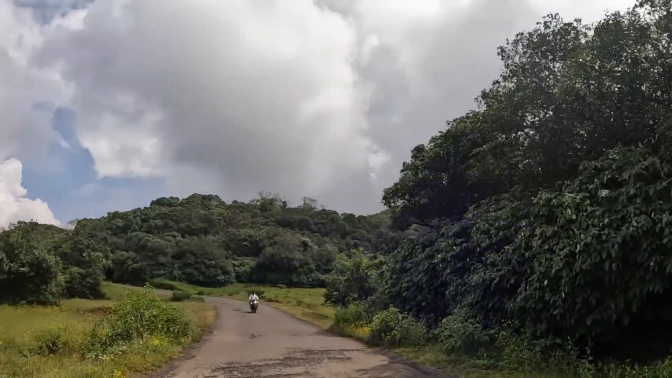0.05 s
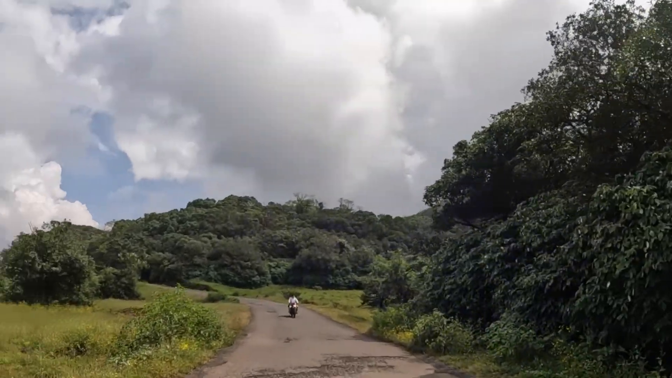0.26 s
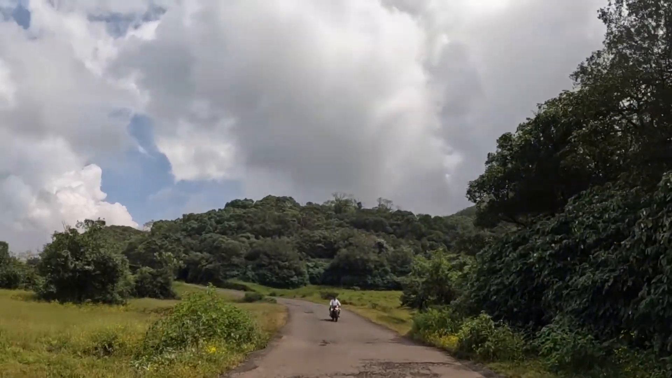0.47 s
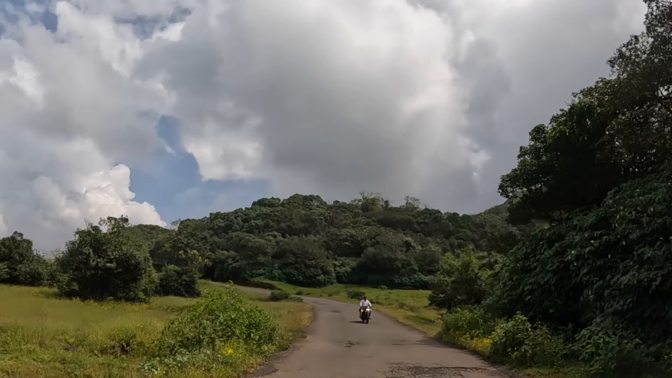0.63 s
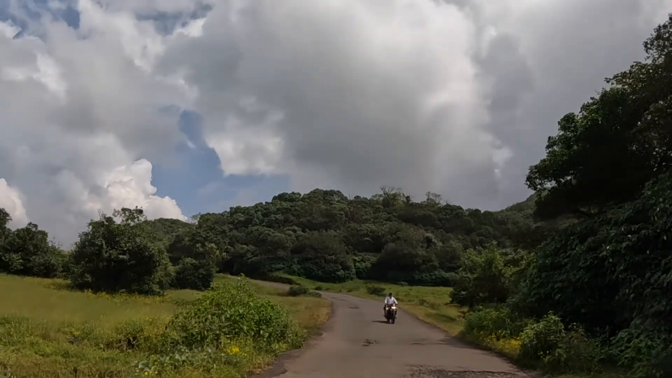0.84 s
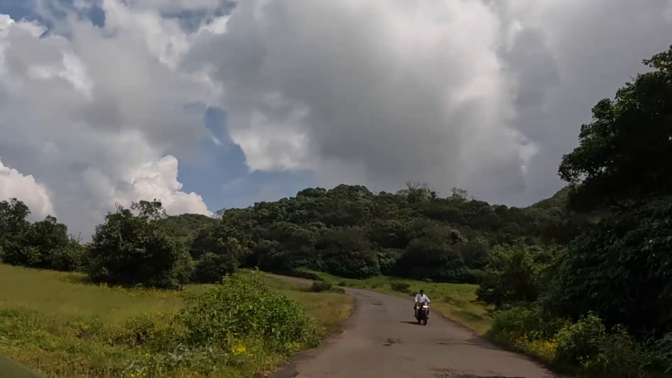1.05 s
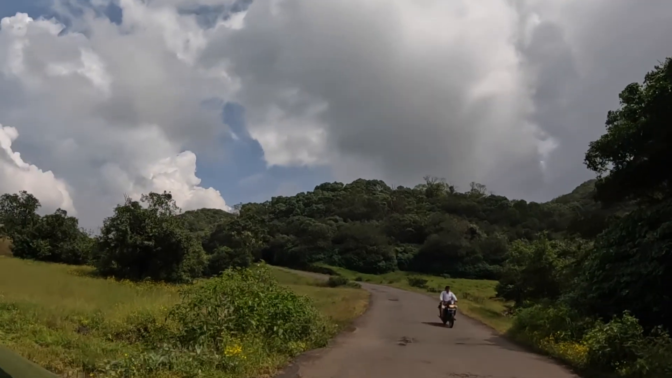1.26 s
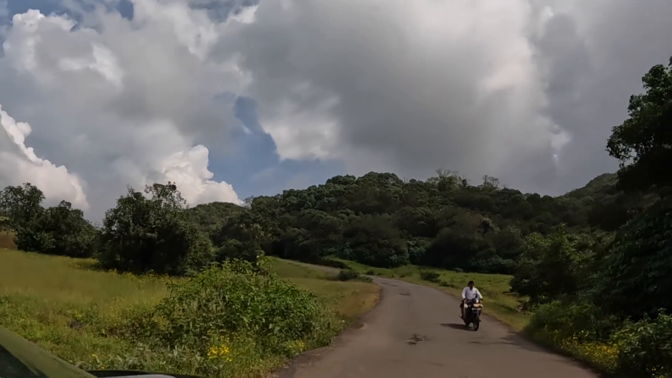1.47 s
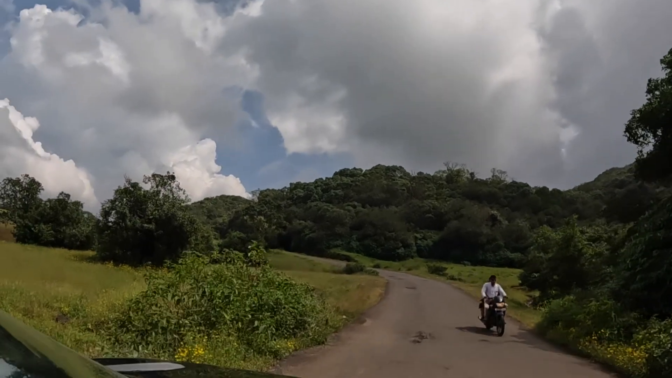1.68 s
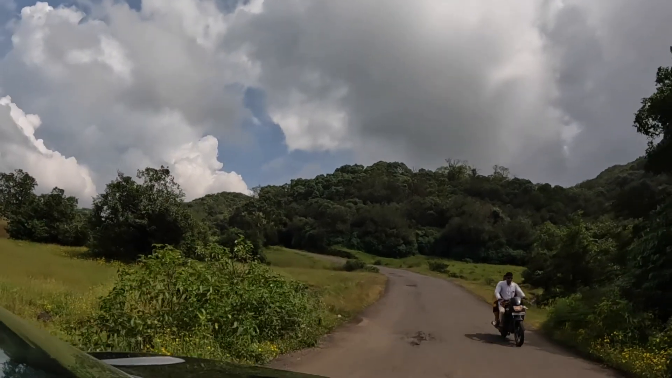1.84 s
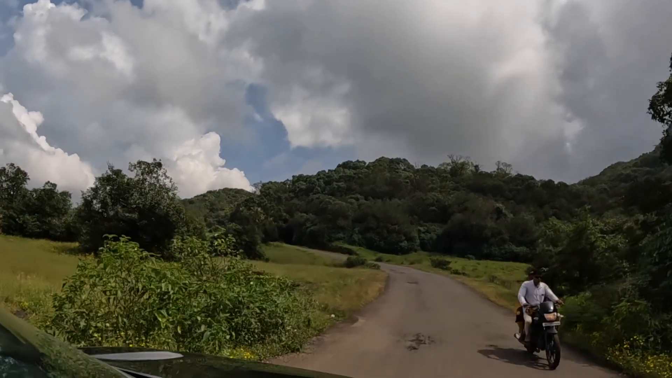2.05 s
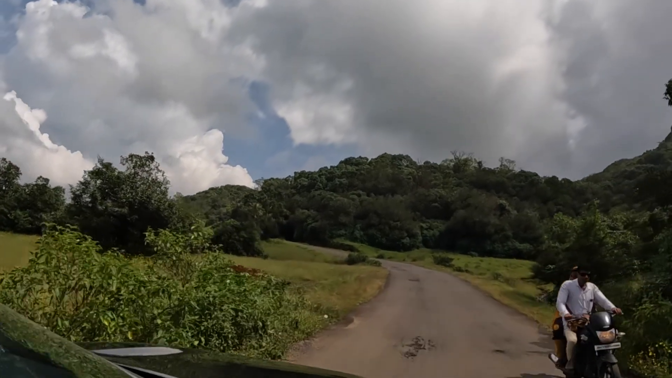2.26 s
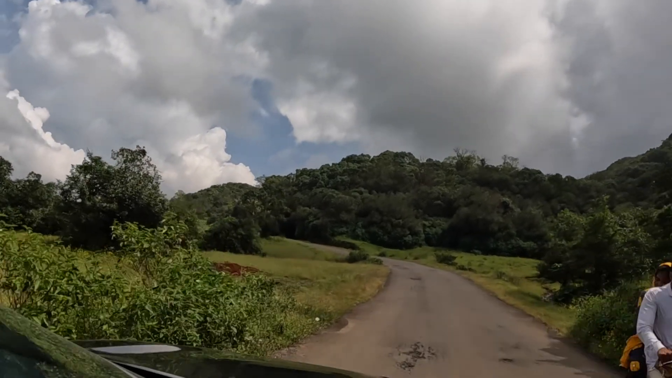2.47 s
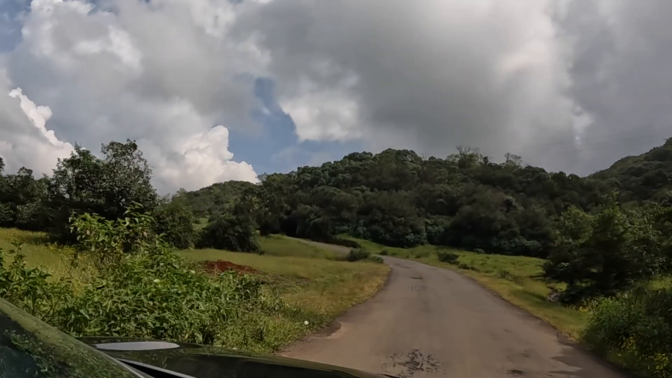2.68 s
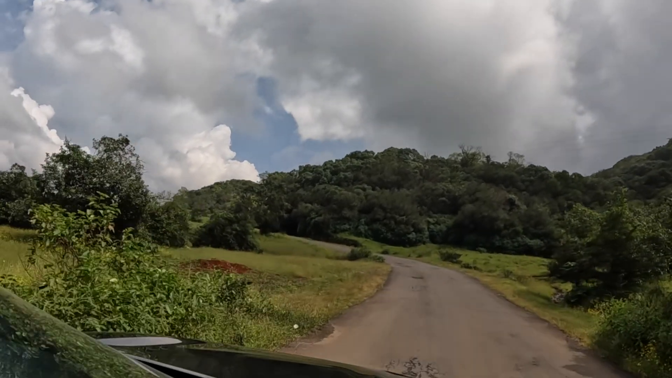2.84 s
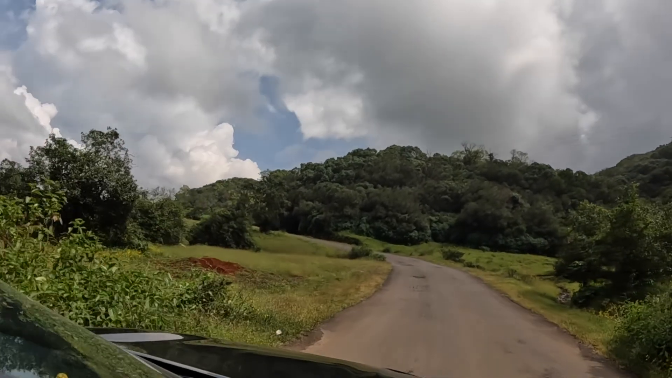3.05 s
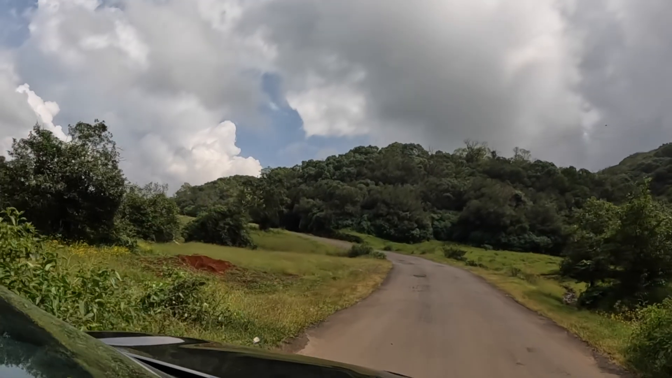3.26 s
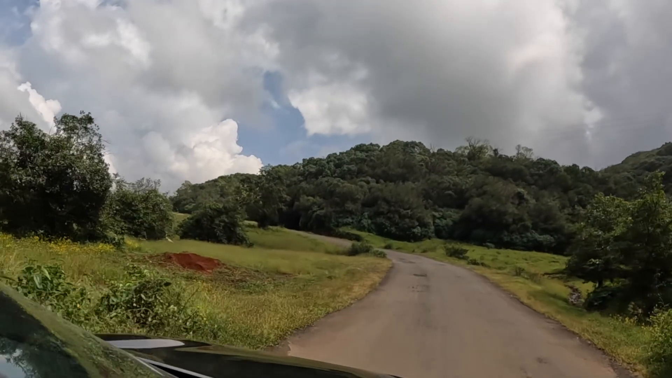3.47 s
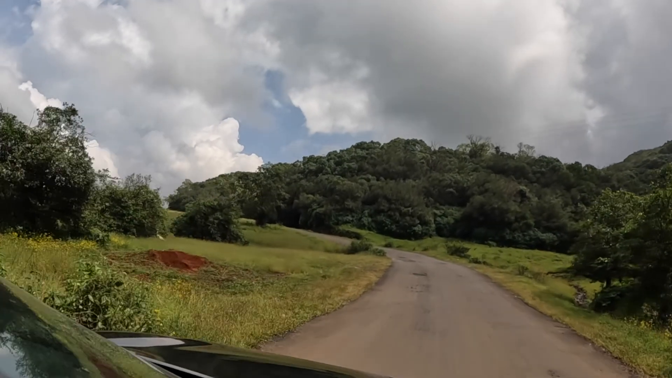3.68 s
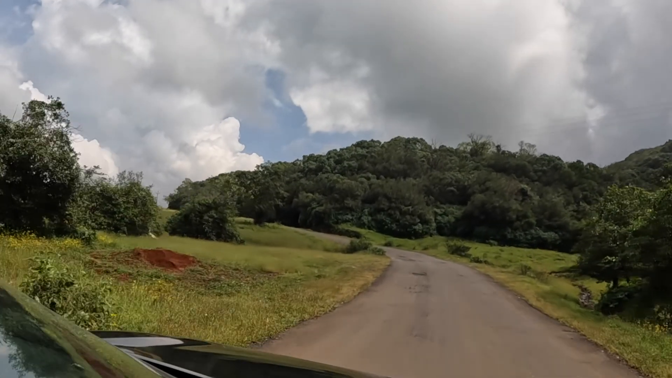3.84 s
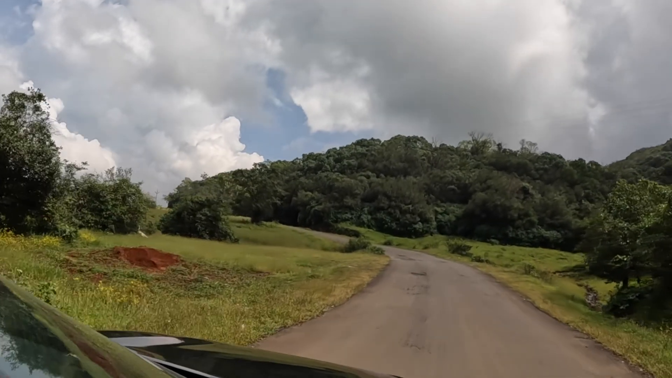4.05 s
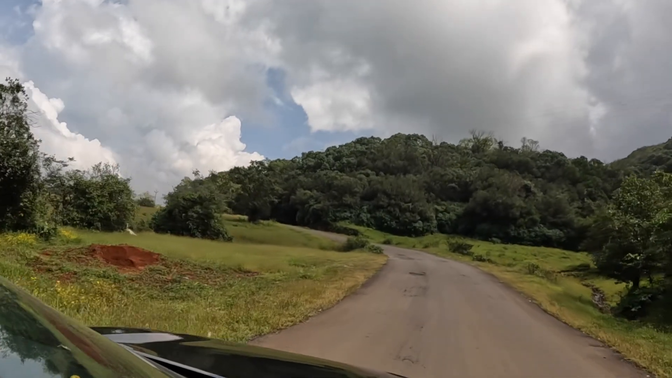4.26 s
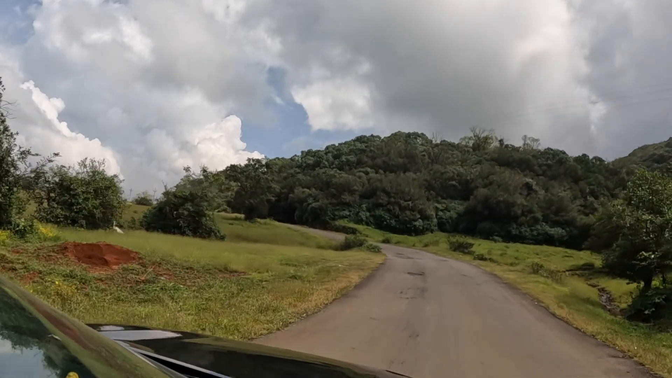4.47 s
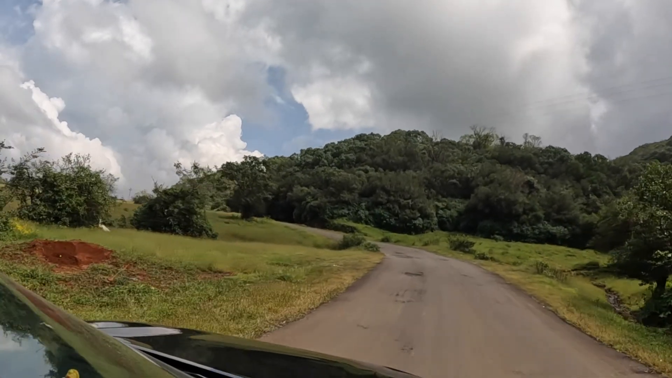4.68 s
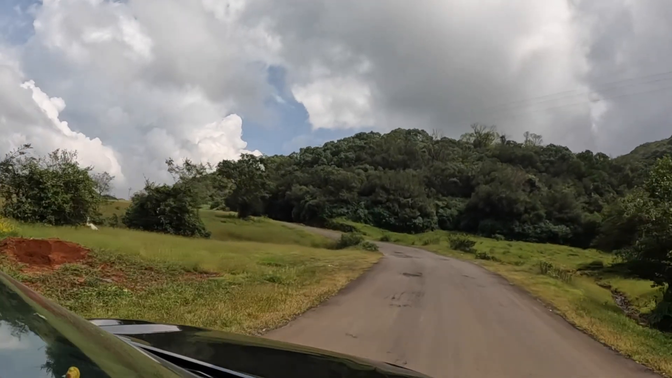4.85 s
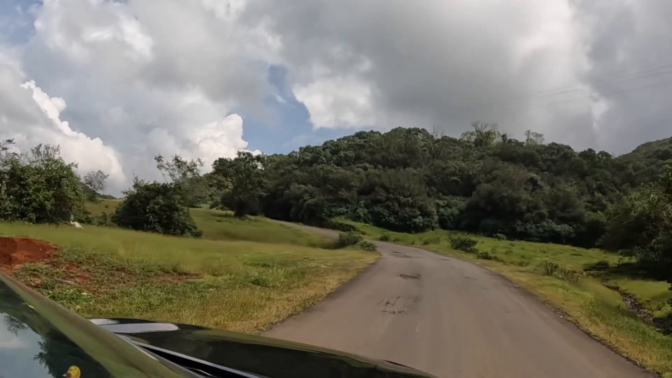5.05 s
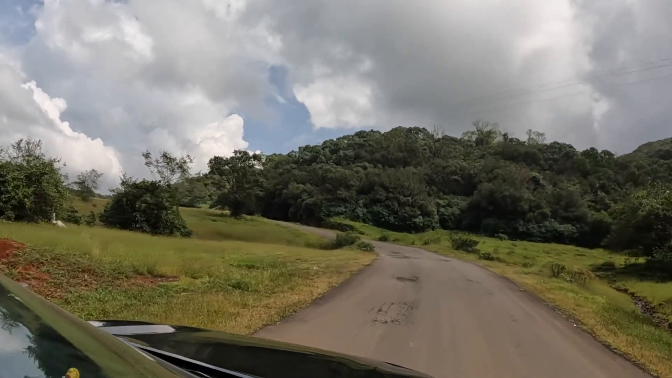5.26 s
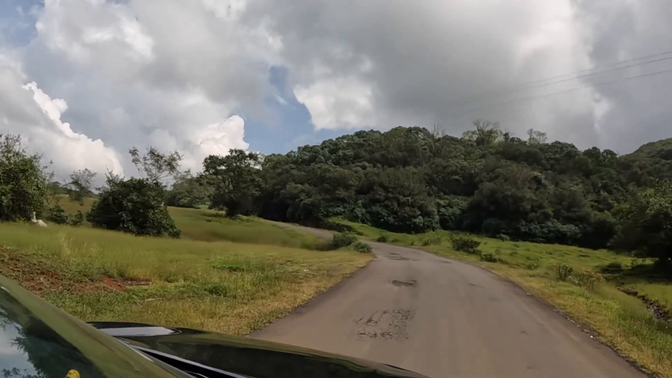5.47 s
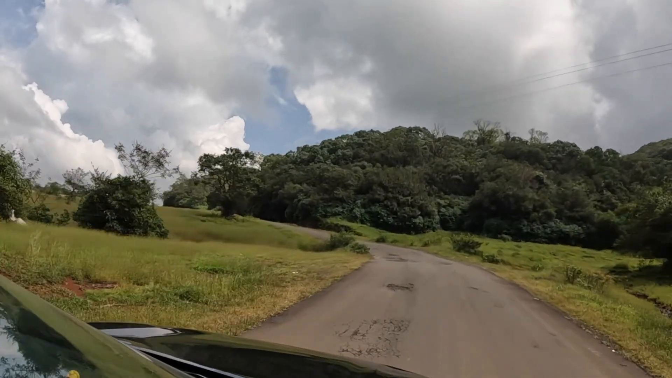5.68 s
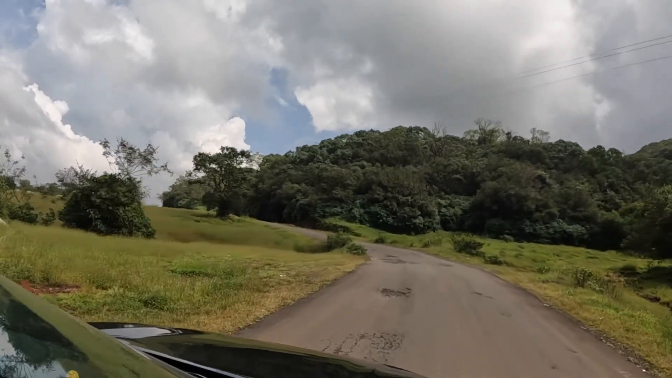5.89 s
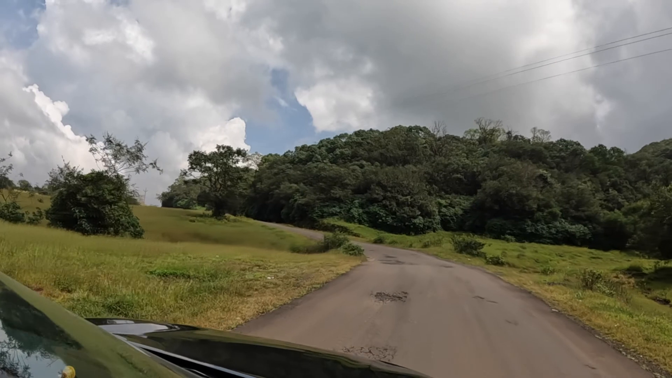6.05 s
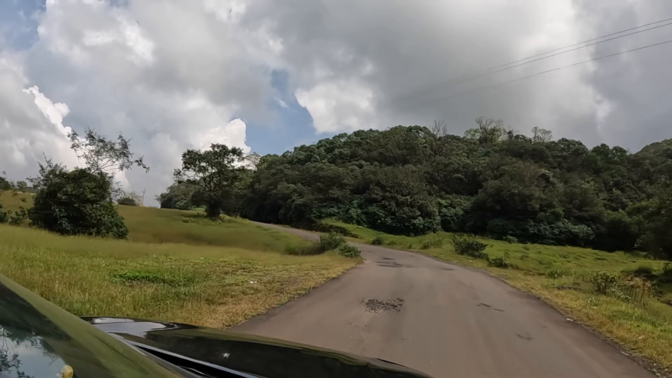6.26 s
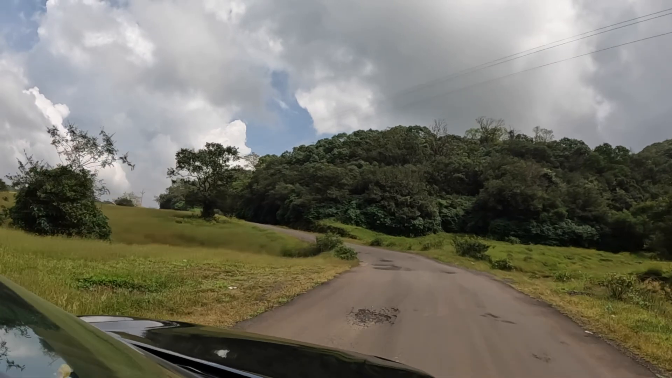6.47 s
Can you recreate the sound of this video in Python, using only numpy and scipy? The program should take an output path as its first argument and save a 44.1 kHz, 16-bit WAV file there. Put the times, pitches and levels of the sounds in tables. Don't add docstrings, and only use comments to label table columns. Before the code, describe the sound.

Inside a car on a rough rural road, close and almost mono. From the start a huge boom near 20 Hz and a shuddering floor rumble dominate, with a hard knock at 0.1 s. Tyre roar and buzzing panels build, swelling near 1.1 s, dropping out briefly, then returning from about 1.25 s. Faint window hiss gusts over it, and a thin, very high brake squeal is strongest around 2.1-2.4 s. At 2.6 s a motorcycle passes in two short, grainy exhaust barks, followed by a rough roar and small rattles peaking near 2.8 s. After 3.2 s the tyres calm; a low engine drone climbs slowly in pitch. Loose parts tap around 5.5 s and 6.0 s. Throughout, boom crests overload the microphone with irregular heavy thumps and pops, notably at 1.2, 1.95, 2.7, 3.5, 3.8, 4.9, 5.55 and 6.2 s, the sound ducking briefly afterwards.

```python
import sys
import numpy as np
from scipy import signal
from scipy.fft import rfft, irfft, next_fast_len
from scipy.io import wavfile
from scipy.ndimage import uniform_filter1d, map_coordinates

SR = 44100
rng = np.random.default_rng(int(sys.argv[2]) if len(sys.argv) > 2 else 0)


def master_out(mix):
    frames = np.transpose(np.atleast_2d(mix))
    ceiling = np.clip(frames, -1, 1)
    pcm = np.round(ceiling * 32767).astype(np.int16)
    wavfile.write(sys.argv[1], SR, pcm)


def boost(x):
    u = np.asarray(x, float) / 20
    return 10 ** u


N = 287532

# t/s, roar level/dB
ROAD = [(0, -46.5), (.1, -45), (.55, -42), (.88, -42), (1.06, -36), (1.1, -47), (1.21, -47), (1.245, -38.5),
        (1.42, -37.5), (1.8, -40), (2.1, -39.5), (2.42, -39), (2.6, -33), (2.76, -33.5), (2.82, -28.5),
        (3.0, -39.5), (3.3, -43.5), (6.52, -43)]
# t/s, change/dB, half width/s
PATCHES = [(.3, 1.5, 0.0332), (.42, -1.5, 0.1212), (.66, -2, 0.0219), (.72, 2, 0.0581),
           (1.37, 1.5, 0.03034), (1.78, -1.5, 0.03), (3.04, 2, .03), (2.27, -2.5, 0.0358),
           (2.93, 2.5, 0.01868), (3.088, 3.5, 0.01667), (5.52, 4, 0.02903), (2.15, 3, 0.0637),
           (2.96, 1.5, 0.01812), (2.735, 0, 0.00915), (3.46, 2, 0.0554), (2.53, -1.5, 0.04392),
           (5.05, -2, 0.0319), (5.64, -0.5, 0.0463), (3.76, -0.5, .06), (4.42, 0.5, 0.205),
           (5.33, -1, 0.0663), (5.8, -1, 0.1163), (6.08, 1, 0.1395)]
# f/Hz, density/dB
TYRE_BED = [(150, -38), (250, 2), (423, 1.5), (530, 2), (833, -2), (921, -0.5), (1260, -11.5), (5000, -22),
            (6500, -58.5), (11000, -120)]
# f/Hz, width/Hz, level/dB
PANELS_NEAR = [(960.6, 57.7, -5), (1537.6, 23, -23.5), (1900, 27.93, -8.5), (2333.7, 56.04, -10),
               (2572, 54.83, -9.5), (3304.2, 271, -11.5), (3992.3, 55.27, -10.5), (4600, 88, -15.5)]
PANELS_SWELL = [(916.33, 55.1, 5), (1262.4, 49.86, -8.5), (1547.6, 76.5, -15.5), (1900, 46.9, -2),
                (2222.4, 111.9, -4), (2660.3, 57.94, -3), (3000, 163.5, -9.5), (3363.7, 125.5, -5.5),
                (3924.6, 45.45, -6.5)]
PANELS_FAR = [(936.4, 38.66, 1), (1455.9, 145.9, -8), (2260, 80, 1.5), (3000, 253.7, -4.5),
              (3792.2, 345.8, -9), (4698, 59, -23)]
PANELS_LATE = [(742.2, 68.2, -1), (1389.6, 29.9, -5.5), (2198.4, 91.8, -4), (2647, 36.4, -11),
               (2900, 85.54, -4)]
PANELS_LAST = [(913.4, 103.1, 2), (1397.6, 50.27, -3), (1972.2, 235.5, -5.5), (2626, 51.1, 0.5),
               (2900, 139.9, -2.5)]
BIKE_ABREAST = [(394.7, 9.2, -15.5), (746, 72.8, 6), (1228, 23.7, -10.5), (1620, 47, -40), (2197, 41, -11),
                (2601.5, 75, -12.5), (2800, 23.5, -20)]
BIKE_BEHIND = [(369.38, 14.33, 5.5), (520.52, 12.03, 2.5), (1061.3, 73.9, -4), (1510.7, 12.15, -15.5),
               (1682, 25.55, -20.5), (2289, 50.5, -16.5), (2286.5, 212.6, -19)]
PANELS_EASING = [(959.2, 137.9, -3.5), (2726.5, 60.7, -9.5)]
PANELS_CALM = [(930, 12, -22), (1977.2, 29, -11.5)]
# end t/s, resonances, bed level/dB, chatter depth/dB, top f/Hz, damping factor
STAGES = [
    (0.841, PANELS_NEAR, 0, -0.8, 3501, 2.178),
    (1.152, PANELS_SWELL, -2.5, 0.5, 3698, 1.0416),
    (1.74, PANELS_FAR, -2, 0.5, 4188, 1.959),
    (2.25, PANELS_LATE, -2.5, 0.5, 3485, 2.775),
    (2.58, PANELS_LAST, -3.5, 1, 3175, 1.932),
    (2.699, BIKE_ABREAST, -8.5, -1.5, 3447, 1.1024),
    (3.051, BIKE_BEHIND, -5.5, 1.4, 4892, 1.626),
    (3.75, PANELS_EASING, -0.5, 1, 4760, 1.91),
    (7, PANELS_CALM, 3.5, 1, 4444, 1.786),
]
# buzz level/dB, hiss level/dB
BRIGHT = [(-45.5, -58), (-44.5, -57), (-43.5, -53), (-44.5, -54.5), (-50.5, -54), (-61, -49.5),
          (-54.5, -51), (-50.5, -57), (-54, -60.5)]
# f/Hz, density/dB
HISS = [(2000, -120), (3500, -3), (4400, -1.5), (5800, -7), (7700, -11), (10000, -13.5), (15700, -15),
        (16200, -120)]
# t/s, change/dB, half width/s
GUSTS = [(.04, -1, 0.04113), (.27, 3, 0.1067), (.46, 4.5, 0.03037), (1.19, -2, 0.02527), (1.52, 5, 0.163),
         (2.33, 5.5, 0.0265), (2.8, 4, 0.0577), (2.95, 2.5, 0.0371), (3.74, 5, 0.054226), (4.45, 4, 0.2807),
         (5.53, 9, 0.028), (5.435, 2, .008), (5.12, 3, .04), (6.19, 5, .02), (6.04, 3, .015),
         (5.62, -2.5, 0.0401), (6.26, -3.5, 0.057545), (1.38, 4.5, 0.0718), (2.86, 0, 0.06804)]
# t/s, level/dB
BRAKE = [(0, -73), (.2, -80.5), (.8, -65.5), (1.2, -66), (1.35, -62), (2.1, -53.5), (2.4, -56),
         (3.0, -70.5), (3.75, -64), (3.95, -83.5), (6.52, -82.5)]
# f/Hz, density/dB
SQUEAL = [(10000, -120), (11500, -37), (13000, -6), (14400, 2.5), (15200, -10.5), (15800, -12.5),
          (16200, -120)]
# t/s, firing f/Hz, load level/dB
ENGINE = [(0, 35, -26.5), (1, 38.1, -36.5), (2.4, 40.8, -3.5), (3, 43.1, 0), (3.45, 43.83, 1),
          (3.75, 45, -10), (4.3, 48.89, 2.5), (4.7, 51.83, -1.5), (5.4, 54.27, 0), (6.05, 56.94, 1),
          (6.52, 57.58, -1)]
# f/Hz, gain/dB
FLOOR_PATH = [(43.5, -38.5), (47, -21.5), (60, -25), (85, -34), (100, -36.5), (130, -44.5), (150, -49),
              (168, -44.5), (200, -43), (228, -56)]
# level/dB, share of load swing
ORDER_GAIN = [(0, 0.507), (0, 1.014), (0, 0.1403), (0, 0.714)]
# t/s, peak level/dB, first mode f/Hz, second mode f/Hz,
# t60/s
KNOCKS = [(.079, -17, 1275, 1870, 0.0286), (.08, -25, 538.8, 3133, 0.03645),
          (3.244, -26.5, 553.1, 941.7, 0.06106), (4.957, -34, 2900, 3285, 0.018162),
          (5.263, -52, 4928, 5203, 0.022192), (5.4821, -23, 1167, 6100, 0.01244),
          (5.502, -22, 730.7, 1900, 0.03506), (5.508, -36, 2405, 2231, 0.042),
          (5.621, -30.5, 3105, 5946, 0.01532), (5.691, -40, 1995, 3000, 0.011),
          (6.031, -31, 8930, 9408, 0.0133), (6.035, -41.5, 7917, 10380, 0.01245),
          (2.76, -42.5, 10300, 4708, 0.0301), (2.788, -48, 11200, 3295, 0.0302),
          (2.808, -34.5, 3000, 4687, 0.0292), (2.853, -31, 4445, 8010, 0.02315),
          (2.89, -30, 2137, 1699, .025), (2.962, -43.5, 10290, 5396, 0.0449),
          (3.0, -33, 1707, 1099, 0.0407), (3.085, -30, 3280, 4514, 0.02694),
          (2.733, -40, 3527, 4506, 0.0207), (2.773, -30.5, 3293, 4600, 0.017),
          (2.977, -35, 997.5, 5043, 0.0254), (5.462, -42.5, 2202, 5800, .012)]
# t/s, rms level/dB, hold/s, fall/dB per 15 ms
BARKS = [
    (2.605, -28, 0.00541, 3),
    (2.61, -24.5, .016, 20.5),
    (2.635, -28, 0.00348, 5),
    (2.64, -21.5, 0.00914, 14),
    (2.659, -26, 0.0072, 25),
]
# f/Hz, width/Hz, level/dB
EXHAUST = [(409.9, 60, -17), (799.54, 200, -1), (1205.2, 110, -7), (1630.2, 150, -30.5), (2119.3, 300, -15),
           (2610.4, 300, -11.5), (3433, 600, -22)]
# f/Hz, width/Hz, level/dB
BOOM = [(9.0195, 5.983, -16.5), (20.734, 3.491, 2.5)]
# t/s, level/dB
BOOM_SWING = [(0, -24.5), (.09, -10.5), (.36, -13), (.72, -10.5), (.96, -20), (1.07, -8.5), (1.29, -19.5),
              (1.36, -11), (1.7, -14), (2.43, -12), (2.5, -16.5), (2.65, -12.5), (2.98, -14), (3.7, -14.5),
              (4.2, -14.5), (5.87, -11), (5.96, -16), (6.3, -13)]
# t/s, f/Hz
BOOM_PITCH = [(0, 21.29), (.27, 22.21), (1.03, 20.3), (1.83, 22.19), (2.2, 20.22), (2.96, 20.88),
              (4.27, 23.51), (5.17, 23.43), (5.5, 20.97), (6.52, 21.6)]
# t/s, shudder level/dB, 12 dB rise/s, 12 dB fall/s (signs ignored)
POTHOLES = [(0, -14.5, .1, 0.0019), (.36, -19.5, 0.555, 1), (1.07, -12, -0.0144, 0.1504),
            (1.91, -16, 0.1596, 0.164), (2.49, -17.5, 1.2306, -1), (2.66, -14, 0.1132, -0.2765),
            (2.98, -12.5, 0.0852, -0.1527), (3.3, -20, 2.2043, -0.24), (3.72, -18.5, 0.3023, -0.2353),
            (3.98, -18.5, -1.5, 1), (4.4, -21, 2.5, 11.5), (5.96, -16.5, 0.2891, 0.7771),
            (6.16, -14.5, 0.3178, -0.23), (6.39, -16, -0.0613, -0.5454)]
# t/s, change/dB, half width/s
RUMBLE_SWELLS = [(.33, 3, 0.077), (.7, 0.5, .2), (1.05, 3, .06), (1.25, 2.5, 0.0511), (1.97, 3, 0.039634),
                 (2.73, -6, 0.06015), (3.17, -7.5, 0.04044), (3.4, 0.5, 0.03547), (4.1, -3, 0.0565),
                 (4.8, -3, 0.1682), (5.17, 4.5, 0.049318), (5.47, 4, 0.03636), (6.04, 3.5, 0.0526),
                 (6.3, -2, 0.1204)]
# f/Hz, density/dB
SHUDDER = [(12, -120), (20, -53.5), (28, -0.5), (38, -2), (52, -10.5), (65, -21.5), (80, -41), (110, -52),
           (200, -120)]
# f/Hz, density/dB
RUMBLE = [(41, -21.5), (70, 0), (140, -15.5), (194, -14), (300, -24), (390, -24), (660, -120)]
# right t/s, right jump/amplitude, left t/s, left jump/amplitude
SNAPS = [(1.15865, .39, 1.16135, .29), (1.4087, .25, 1.4087, 0), (1.5216, 0, 1.5216, .33),
         (1.95235, .39, 1.95405, .36), (2.1767, .33, 2.17865, .28), (2.6592, .36, 2.66125, .28),
         (3.1016, .07, 3.09985, .39), (3.50945, .35, 3.5113, .33), (3.82205, .38, 3.82395, .3),
         (4.7276, .31, 4.7276, 0), (4.9337, .42, 4.93585, .29), (5.5534, .05, 5.54985, .27),
         (6.1829, .46, 6.18415, .42), (6.519, .14, 6.5155, .04)]
# t/s, jump/amplitude, run/s
TICKS = [(2.029, 0.055, 0), (2.25, 0.04387, 0), (2.294, 0.03828, 0), (2.448, 0.04483, 0),
         (2.686, 0.07776, 0), (3.037, 0.04, 0), (3.121, 0.06337, 0), (3.221, 0.02565, 0),
         (3.336, 0.032172, 0), (3.535, 0.02569, 0), (3.614, 0.03014, 0), (3.684, 0.013, 0),
         (3.847, 0.0353, .022), (3.98, 0.0234, .022), (4.076, 0.02779, .022), (4.173, 0.03757, 0),
         (4.797, .04, 0), (5.001, 0.02927, 0), (5.103, 0.02431, .042), (5.312, 0.01843, .02),
         (5.377, 0.05, 0), (5.486, 0.05408, 0), (5.556, 0.03259, 0), (5.623, 0.03318, 0),
         (5.692, 0.03994, 0), (5.82, 0.05548, 0), (5.892, 0.02554, 0), (6.204, 0.04, .022),
         (6.294, 0.01463, .02), (6.403, 0.03393, .042), (1.014, 0.01658, 0), (1.933, .03, 0),
         (2.077, 0.01236, 0), (2.105, 0.01822, .02), (2.339, 0.0325, 0), (3.149, 0.04242, 0),
         (3.968, 0.02263, 0), (5.069, 0.021912, .02), (5.177, 0.00949, 0), (5.211, 0.01525, 0),
         (5.245, .018, .02), (5.432, 0.01404, .02), (5.464, 0.02356, 0), (5.482, 0.0362, 0),
         (5.49, 0.03192, 0), (5.506, .035, 0), (5.719, 0.021, 0), (5.962, 0.0138, 0), (6.343, 0.0074, 0),
         (6.383, 0.01052, 0)]
# f/Hz, density/dB
SELF_NOISE = [(2000, -120), (4000, -1.5), (8000, 2), (15500, -3.5), (16200, -120)]


def unit(x):
    return x / np.sqrt(np.mean(x ** 2) + 1e-20)


def along(points, hz):
    f, db = np.transpose(points)
    return boost(np.interp(np.log(hz + 1), np.log(f + 1), db))


def curves(rows):
    s, *cols = np.transpose(rows)
    return [np.interp(np.arange(N) / SR, s, c) for c in cols]


def swells(rows):
    t = np.arange(0, N / SR + 1 / 500, 1 / 1000)
    total_db = sum(db * np.exp(-((t - s) / width_s) ** 2) for s, db, width_s in rows)
    return np.interp(np.arange(N) / SR, t, total_db)


def wobble(rate_hz):
    at = np.arange(0, N, 16)
    knots = rng.standard_normal(int(N * rate_hz / SR) + 4)
    return unit(np.interp(np.arange(N), at, map_coordinates(knots, [at * rate_hz / SR])))


def filtered(x, response):
    n = x.shape[-1]
    m = next_fast_len(n + SR // 2)
    return irfft(rfft(x, m) * response(np.fft.rfftfreq(m, 1 / SR)), m)[..., :n]


def ringing(modes, f):
    return sum((-1) ** k * boost(db) * 1j * f * w / (c * c - f * f + 1j * f * w)
               for k, (c, w, db) in enumerate(modes))


def noise(response, side_db):
    mid, side = filtered(rng.standard_normal((2, N)), response)
    return unit(np.array([mid + boost(side_db) * side, mid - boost(side_db) * side]))


def roar_level_db():
    return curves(ROAD)[0] + swells(PATCHES)


def road_swing_db():
    return roar_level_db() + 42


def dashboard_whir():
    whir = noise(np.ones_like, side_db=-25)
    whir = filtered(whir, lambda f: ringing([(7153.2, 580, 0)], f) ** 2)
    return boost(-67 + 0.8 * wobble(4.8)) * unit(whir)


def window_hiss():
    ends_s = [stage[0] for stage in STAGES]
    stage_at = np.searchsorted(ends_s, np.arange(N) / SR)
    stage_db = np.array([hiss_db for _, hiss_db in BRIGHT], float)[stage_at]
    level_db = uniform_filter1d(stage_db, size=4000) + 0.3067 * road_swing_db() + swells(GUSTS)
    grit = boost(1.6374 * wobble(45) + 0.918 * wobble(11))
    return boost(level_db) * unit(grit * noise(lambda f: along(HISS, f), side_db=-26.0))


def brake_squeal():
    flutter = boost(1.5 * wobble(30) + 4.5 * wobble(170))
    squeal = flutter * noise(lambda f: along(SQUEAL, f), side_db=-47.5)
    return boost(curves(BRAKE)[0] - 4.0) * unit(squeal)


def tyres_and_panels():
    t, start_s, out = np.arange(N) / SR, -1, np.zeros((2, N))
    roar_db, swing_db = roar_level_db(), road_swing_db()
    white, chatter, lumps = noise(np.ones_like, side_db=-25), wobble(90), wobble(25)

    def low(f):
        return 1 / np.sqrt(1 + (f / 1650) ** 8)

    for stage, (buzz_db, _) in zip(STAGES, BRIGHT):
        end_s, modes, bed_db, chatter_db, top_hz, damping = stage
        fade_in = np.clip((t - start_s) / 0.0139, 0, 1)
        fade_out = np.clip(1 - (t - end_s) / 0.0697, 0, 1)
        on = np.sqrt(fade_in * fade_out)
        now = on > 0
        loose = [(hz, width_hz * damping, db) for hz, width_hz, db in modes]

        def colour(f):
            body = np.hypot(np.abs(ringing(loose, f)), boost(bed_db) * along(TYRE_BED, f))
            return body / (1 + (270 / (f + 1)) ** 6)

        def high(f):
            shelf = 0.4572 / (1 + (f / 5000) ** 6) + 0.4527 / (1 + (f / top_hz) ** 16)
            return np.sqrt(1 - low(f) ** 2) * shelf

        drive = np.roll(white, round(end_s * 3001), 1)[:, now]
        drive = drive * boost(chatter_db * chatter + 0.7 * lumps)[now]
        roar = unit(filtered(drive, lambda f: colour(f) * low(f)))
        buzz = unit(filtered(drive, lambda f: colour(f) * high(f)))
        buzz_gain = boost(buzz_db + 1.7431 * swing_db[now])
        out[:, now] += on[now] * (boost(roar_db[now]) * roar + buzz_gain * buzz)
        start_s = end_s
    return out


def engine():
    firing_hz, load_db = curves(ENGINE)
    phase = 2 * np.pi * np.cumsum(firing_hz) / SR
    slip = .2 * wobble(9)
    out = np.zeros(N)
    for order, (db, load_share) in enumerate(ORDER_GAIN, 1):
        level_db = db + load_share * load_db + 1.4024 * wobble(8.7)
        tone = np.sin(order * phase + np.sqrt(order) * slip)
        out += along(FLOOR_PATH, order * firing_hz) * boost(level_db) * tone
    return np.sqrt(2) * out


def knocks():
    out, t = np.zeros(N + SR), np.arange(SR // 8) / SR
    for s, db, low_hz, high_hz, t60_s in KNOCKS:
        ring = np.sin(2 * np.pi * low_hz * t)
        ring += 0.7726 * np.sqrt(low_hz / high_hz) * np.sin(2 * np.pi * high_hz * t)
        rough = 1 + 2.5 * uniform_filter1d(rng.standard_normal(len(t)), size=40)
        envelope = boost(-60 * t / t60_s) * (1 - np.exp(-t / 0.000553))
        crack = 0.091 * boost(-60 * t / 0.0025) * rng.standard_normal(len(t))
        out[round(s * SR):][:len(t)] += boost(db) * (ring * rough * envelope + crack)
    return out[:N]


def motorcycle():
    t = np.arange(N) / SR
    gate = np.zeros(N)
    for s, db, hold_s, fall_db in BARKS:
        onset = (t > s) * (1 + .9 * np.exp(-np.abs(t - s) / .004))
        gate += boost(db) * onset * boost(-fall_db * np.clip(t - s - hold_s, 0, 1) / 0.014845)

    def colour(f):
        door = (1 + 1.2j * f / 3600 - (f / 3600) ** 2) ** 2
        return (ringing(EXHAUST, f) + boost(-14) * along(TYRE_BED, f)) / door

    blast = unit(boost(2.2 * wobble(250)) * rng.standard_normal(N))
    colour_rms = np.sqrt(np.mean(np.abs(colour(np.linspace(1, SR / 2, 4000))) ** 2))
    return filtered(gate * blast, colour) / colour_rms


def floor():
    t, smooth_db = np.arange(N) / SR, -27.5
    jolts = np.zeros(N)
    for s, db, rise_s, fall_s in POTHOLES:
        away = np.maximum((s - t) / abs(rise_s), (t - s) / abs(fall_s))
        jolts += boost(db - 11.345 * away) ** 2
    shudder_db = 10 * np.log10(jolts + boost(smooth_db) ** 2)
    rumble_db = -33.8 + 0.27274 * (shudder_db - smooth_db) + swells(RUMBLE_SWELLS)
    bumps = wobble(9)
    shudder = boost(1.2 * bumps) * noise(lambda f: along(SHUDDER, f), side_db=-25.5)
    rumble = boost(bumps + 0.9785 * wobble(20)) * noise(lambda f: along(RUMBLE, f), side_db=-28)
    return boost(shudder_db) * unit(shudder) + boost(rumble_db) * unit(rumble)


def boom_tone():
    cycles = np.cumsum(curves(BOOM_PITCH)[0] * (1 + .03 * wobble(3))) / SR
    at = np.round(np.transpose(SNAPS)[0, :-1] * SR).astype(int)
    past_crest = cycles[at] - 1 / 4
    off_crest = past_crest - np.round(2 * past_crest) / 2
    return np.sqrt(2) * np.sin(2 * np.pi * (cycles - np.interp(np.arange(N), at, off_crest)))


def cabin_boom():
    surges = [(s, 4.5 * (right + left), 0.05001) for s, right, _, left in SNAPS]
    boom_db = curves(BOOM_SWING)[0] + swells(surges)
    rough = noise(lambda f: ringing(BOOM, f) / (1 + (f / 32) ** 6), side_db=-26.5)
    return boost(boom_db) * unit(boom_tone() + 0.5731 * rough)


def scene():
    outside = dashboard_whir() + window_hiss() + brake_squeal() + tyres_and_panels()
    mix = outside + engine() + knocks() + motorcycle() + floor() + cabin_boom()
    return mix * boost([[-.1], [.1]])


def overload_steps(pressure):
    crest_gap_s, spread_s = .021, .005
    full, small = np.zeros((2, N)), np.zeros((2, N))
    right_s, right, left_s, left = np.transpose(SNAPS)
    left_at, right_at = np.round(left_s * SR).astype(int), np.round(right_s * SR).astype(int)
    full[0, left_at], full[1, right_at] = left, right
    crest = np.sign(pressure)
    crest[0, left_at] = crest[1, right_at]
    luck = rng.random((len(TICKS), 3, 2, 2, 2))
    for (s, jump, run_s), draws in zip(TICKS, luck):
        for k in range(1 + round(run_s / crest_gap_s)):
            at_s = s + k * crest_gap_s + spread_s * (draws[k, ..., 0] - .5)
            at = np.round(at_s * SR).astype(int)
            small[[[0], [1]], at] = jump * (.5 + draws[k, ..., 1])
    return -(full + small) * crest, full, small


def overload(pressure, cross_hz, held_s, sag_s, share, settle_hz, duck_db, grip_s, recover_s, boom_hz):
    steps, full, small = overload_steps(pressure)
    w0 = 2 * np.pi * cross_hz

    def snap_response(f):
        p = 2j * np.pi * f
        split = (p * p - np.sqrt(2) * w0 * p + w0 * w0) / (p * p + np.sqrt(2) * w0 * p + w0 * w0)
        release = share * sag_s / (1 + p * sag_s) - (1 - share) * held_s / (1 - p * held_s)
        band = f ** 2 / (f ** 2 + settle_hz ** 2) / (1 + (f / 13500) ** 4)
        return SR * 1.25 * release * split * band

    def strain_response(f):
        p = 2j * np.pi * f
        return SR * recover_s / (1 + p * recover_s) / (1 + p * grip_s)

    snap = filtered(steps, snap_response)
    strain = filtered(full.sum(0) + 0.7349 * small.sum(0), strain_response)
    near = uniform_filter1d(uniform_filter1d(np.abs(steps) ** .3, size=500), size=500) * 500
    fizz = signal.lfilter([.15, .15], [1, -.7], rng.standard_normal((2, N)))
    boom = filtered(pressure, lambda f: 1 / (1 + (f / boom_hz) ** 8))
    ducked = (pressure - boom) * boost(duck_db * strain)
    return boom + ducked + snap + boost(-44.0) * np.abs(near) * fizz


def band_limit(x):
    return signal.sosfilt(signal.butter(12, 16190, fs=SR, output="sos"), x)


def record(dry):
    x = overload(dry, cross_hz=232.59, held_s=0.0081, sag_s=0.0062, share=0.35, settle_hz=132,
                 duck_db=-7.5, grip_s=0.015, recover_s=0.20998, boom_hz=24.912)
    x = x + boost(-82.5) * noise(lambda f: along(SELF_NOISE, f), side_db=-5)
    x = x / (1 + np.abs(x / 0.81776) ** 5) ** (1 / 5)
    return band_limit(x)


dry = scene()
out = record(dry)
master_out(out)
```